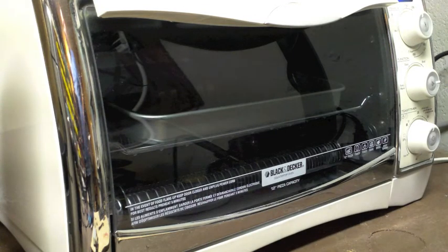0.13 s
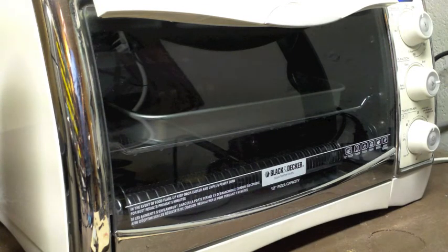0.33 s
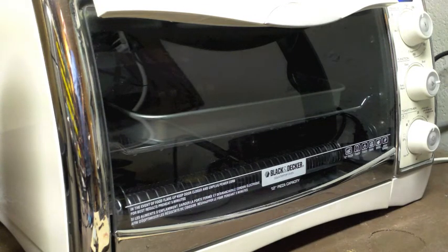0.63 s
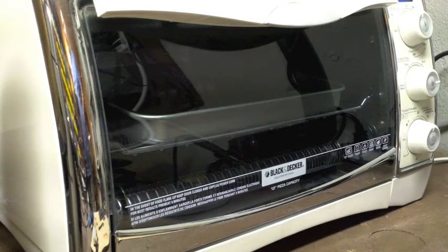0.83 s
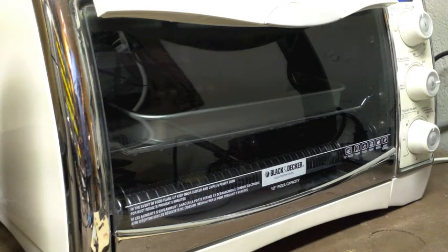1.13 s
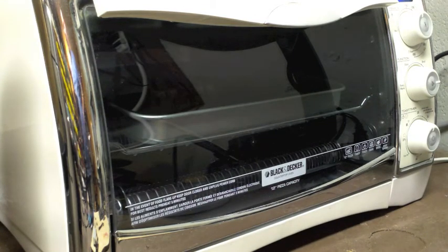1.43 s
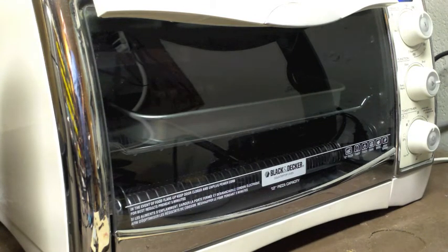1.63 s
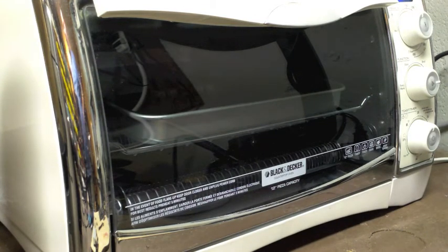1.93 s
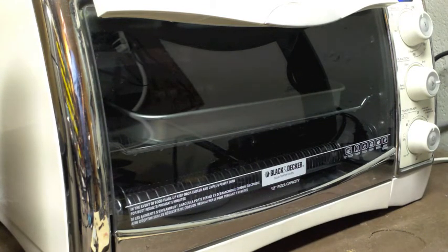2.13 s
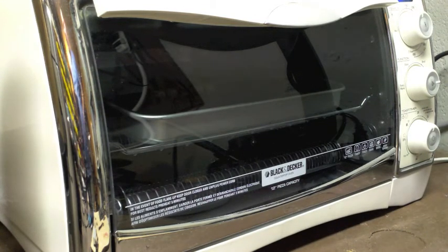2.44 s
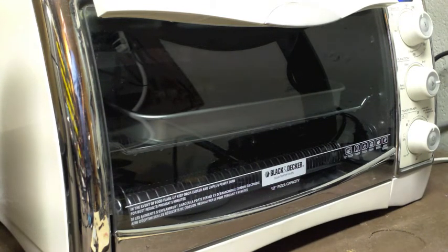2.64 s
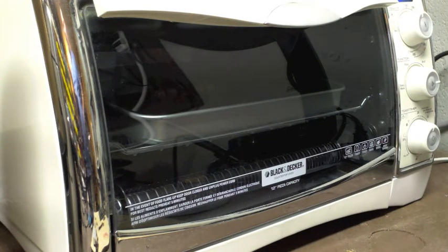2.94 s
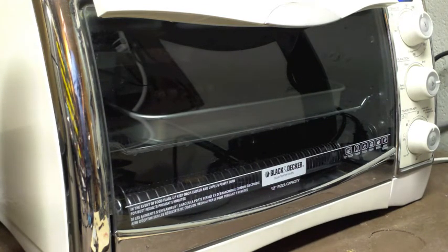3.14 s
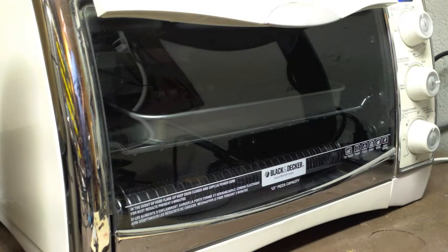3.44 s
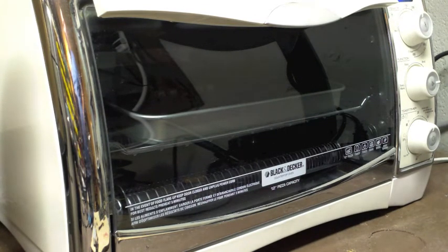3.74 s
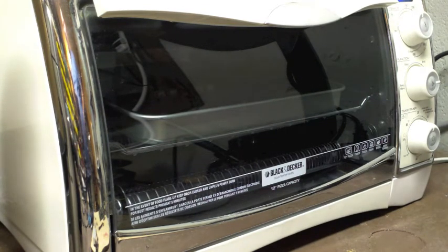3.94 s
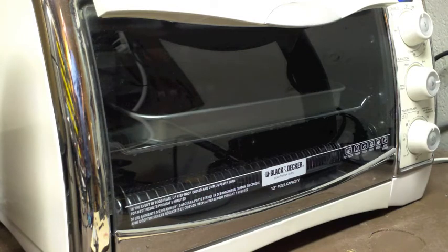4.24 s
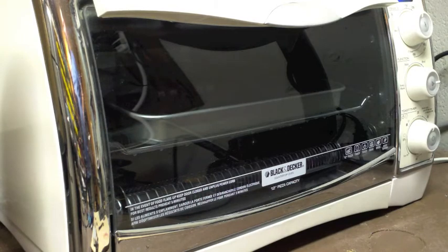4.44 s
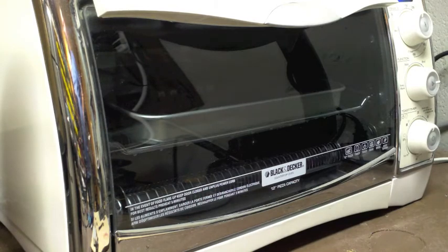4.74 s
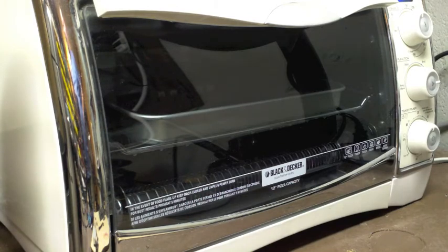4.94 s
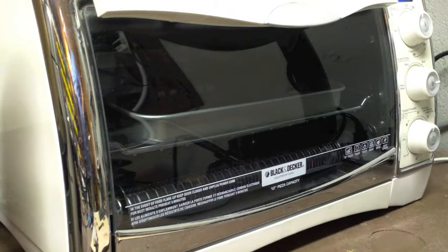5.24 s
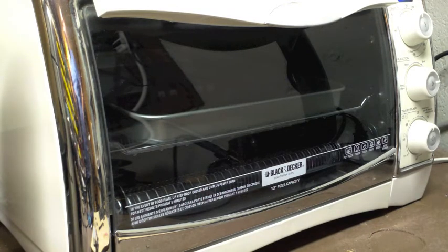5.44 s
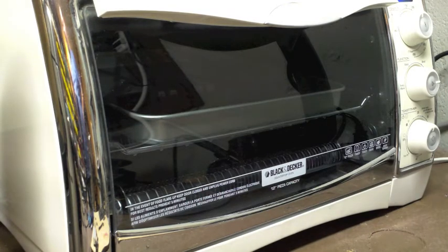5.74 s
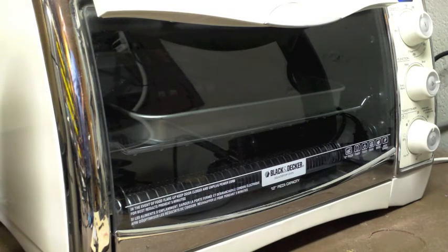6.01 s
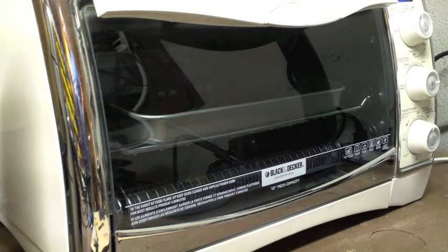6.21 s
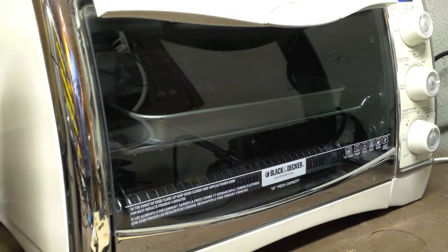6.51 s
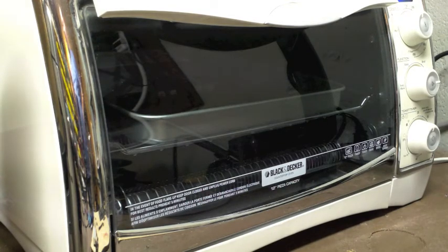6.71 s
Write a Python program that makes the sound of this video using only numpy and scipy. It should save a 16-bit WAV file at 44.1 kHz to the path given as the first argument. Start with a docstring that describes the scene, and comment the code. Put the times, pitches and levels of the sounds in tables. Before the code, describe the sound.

A toaster oven's mechanical timer ticks close to the microphone in a small room, a bright double tick alternating with a lighter tock, about four beats a second. Faint mains hum and airy whirr lie underneath. Midway a few tiny metal pings appear, then a switch scrapes, chinks and snaps loudly once with a brief metallic ring. The ticking carries on unchanged to the end.

```python
"""A toaster oven's clockwork timer ticks close by in a small room.
Its escapement alternates a double tick with a lighter tock: short steel clicks, then filtered noise and
sine tones that stand for the ringing case. The warming metal pings four times, and a switch scrapes,
catches and snaps once: noise bursts and fading tones. Below lie mains hum, built from sines, and room air
with a faint whirr, made of filtered noise."""
import sys
import numpy as np
from scipy import signal
from scipy.fft import rfft, irfft
from scipy.io import wavfile
from scipy.ndimage import uniform_filter1d

SR = 44100
rng = np.random.default_rng(int(sys.argv[2]) if len(sys.argv) > 2 else 0)


def materialize(psi):
    """Save the field psi as 16-bit PCM at rate SR to the path in sys.argv[1].

    A 1-D psi becomes a single channel; in a 2-D psi each row is a channel.
    """
    bounded = np.clip(np.atleast_2d(psi).T, -1, 1)
    quanta = np.round(bounded * 32767).astype(np.int16)
    wavfile.write(sys.argv[1], SR, quanta)


N = 302833
T = np.arange(N) / SR
RING = T[:SR // 3]  # the time axis of one short sound, a third of a second
# the escapement: first tick, one full swing of the balance, and the tock's place in the swing
FIRST_TICK_S, SWING_S, TOCK_AFTER_S = .1784, .46416, .2434
# the blows harden and soften in a slow cycle, as from a slightly off-centre wheel:
# the time of one turn, and a moment when the blows are hardest
WHEEL_TURN_S, HARDEST_S = 7.6, 1.3
TOOTH_SCATTER_DB = .5  # no two teeth strike quite alike
SOFT_LAG_S = .0007  # the softer the blows, the later the beat: lag either side of the mean


def undb(db):
    """Turn decibels into a gain."""
    return 10 ** (np.asarray(db) / 20)


def unit(x):
    """Scale to an rms (average strength) of 1."""
    return x / np.sqrt(np.mean(x ** 2))


def curve(table, axis=1):
    """Join one column of a table by straight lines in time."""
    rows = np.array(table, float)
    return np.interp(T, rows[:, 0], rows[:, axis])


def walk(rate):
    """Slow random wander of rms 1: random steps, 'rate' of them a second, smoothed twice."""
    step_len = int(SR / rate)
    steps = np.repeat(rng.standard_normal(N // step_len + 1), step_len)[:N]
    smoothed = uniform_filter1d(steps, step_len)
    return unit(uniform_filter1d(smoothed, step_len))


def colour(x, spectrum, peaks=()):
    """Filter by a smooth spectrum with narrow resonances on top; rms 1."""
    hz = np.arange(len(x) // 2 + 1) * SR / len(x) + 1e-3  # the tiny offset avoids log(0)
    points = np.array(spectrum, float)
    db = np.interp(np.log(hz), np.log(points[:, 0]), points[:, 1])
    for centre, width, peak_db in peaks:
        db = db + peak_db / (1 + (2 * (hz - centre) / width) ** 2)
    # roll off the bass from half the lowest listed frequency
    low_cut = 1 / np.sqrt(1 + (points[0, 0] / 2 / hz) ** 4)
    return unit(irfft(rfft(x) * undb(db) * low_cut, len(x)))


def hum(hum_db=-1.24, waver_db=0.9):
    """The mains shakes the case at twice its frequency, with a thin wavering buzz of its multiples."""
    # Strength of the hum. Each row: time in seconds, level in dB before hum_db is added.
    hum_levels = [(0, -64.5), (1, -63), (2, -59.5), (3, -57), (4, -55), (4.7, -57.5), (5.4, -56),
                  (6.1, -59.5), (6.87, -59)]
    # Steady buzz. Each row: multiple of the mains frequency, level in dB at the start, level in dB at the end.
    buzz_lines = [(1, -65.5, -80), (3, -74, -75), (4, -73, -70.5), (14, -84, -68.5), (16, -70, -72),
                  (18, -72, -76), (22, -74, -80), (24, -71, -92), (26, -91, -86), (28, -70, -72)]
    mains_hz = 60
    phase = 2 * np.pi * mains_hz * T
    level_db = curve(hum_levels) + hum_db + .5 * walk(2.43)
    out = undb(level_db) * np.sin(2 * phase)
    for multiple, start_db, end_db in buzz_lines:
        db = np.linspace(start_db, end_db, N) + waver_db * walk(3.16)
        phase_wander = walk(5)
        out += undb(db) * np.sin(multiple * phase + phase_wander)
    return np.sqrt(2) * out  # makes the levels rms levels


def background(air_db=-50.0, flicker_db=0.66):
    """Room air with a resonant whirr; a soft hiss dies away early and a low rumble swells late."""
    # Tone of the room air. Each row: frequency in Hz, relative level in dB per Hz.
    air_spectrum = [(25, 1.5), (85, -3.5), (160, -2), (300, -6), (500, -7), (1000, -11), (1800, -10.5),
                    (2700, -14), (5000, -13.5), (6600, -11.5), (8200, -14), (9400, -11.5), (12000, -18.5),
                    (15700, -21)]
    # Narrow resonances in the drone and whirr. Each row: frequency in Hz, width in Hz, boost in dB.
    whirr_peaks = [(84, 10, 7), (280, 40, 3), (1700, 250, 2.5), (3112, 45, 11), (3270, 60, 4),
                   (6370, 40, 4), (6713, 45, 9), (7407, 40, 4), (8538, 15, 11), (8608, 15, 9),
                   (8742, 50, 7), (9020, 90, 6), (9722, 40, 5), (10320, 15, 10), (11650, 15, 7)]
    # Slow changes. Each row: time in seconds, extra hiss level in dB, low rumble level in dB.
    drift = [(0, -50, -80), (.2, -51, -84), (.5, -67, -79), (6.65, -76, -78), (6.87, -80, -48)]
    air = colour(rng.standard_normal(N), air_spectrum, whirr_peaks)
    air = air * undb(air_db + flicker_db * walk(20))
    hiss = colour(rng.standard_normal(N), [(3000, -1), (6500, 4), (10000, 5.0), (15000, -9)])
    rumble = colour(rng.standard_normal(N), [(30, 2), (60, -27), (200, -20), (2000, -70)])
    return air + hiss * undb(curve(drift)) + rumble * undb(curve(drift, axis=2))


def noise(spacing_hz=38):
    """The dense modes of thin metal: evenly spread on average, equally strong, in random phase."""
    count = int(20000 / spacing_hz)
    hz = (np.arange(count) + rng.uniform(.1, .9, count)) * spacing_hz
    bins = (hz * len(RING) / SR).astype(int)
    spectrum = np.zeros(len(RING) // 2 + 1, complex)
    spectrum[bins] = np.exp(2j * np.pi * rng.random(count))
    return unit(irfft(spectrum, len(RING)))


def fade(x, rise_s, t60_s):
    """Build up, then die away by 60 dB in t60_s; the energy is that of 30 ms at rms 1."""
    rise = 1 - np.exp(-(RING / rise_s) ** 2)
    decay = np.exp(-np.log(1000) * RING / t60_s)
    y = x * rise * decay
    return y / np.sqrt(np.sum(y ** 2) / (.03 * SR))


def add(track, s, sound):
    """Mix a sound into the track at a time in seconds."""
    start = int(np.clip(s * SR, 0, N))
    track[start:start + len(sound)] += sound[:N - start]


def hardness(s):
    """Where the wheel stands in its turn: 1 at the hardest blows, -1 at the softest."""
    return np.cos(2 * np.pi * (s - HARDEST_S) / WHEEL_TURN_S)


def swings(offset_s):
    """The times of a blow that comes once in every swing of the balance."""
    even = np.arange(FIRST_TICK_S + offset_s, N / SR, SWING_S)
    return even - SOFT_LAG_S * hardness(even)


def blow(s, mean_db, rise_db):
    """Level of a blow in dB: it follows the turn of the wheel, with a little scatter from tooth to tooth."""
    return mean_db + rise_db * hardness(s) + TOOTH_SCATTER_DB * rng.standard_normal()


def case(dense, modes_db, fresh=0.4, scatter_db=3, detune=0.0029):
    """The case answers each blow with the same modes, in a slightly different mix and tuning."""
    # Modes of the clockwork and its case, before scatter and filtering.
    # Each row: frequency in Hz, relative level in dB.
    case_modes = [(1324, -.5), (1431, -5.5), (1550, -5), (1695, -5), (2034, -3), (2363, -3), (2551, -3),
                  (2650, -4), (3810, -7), (3875, -3), (4247, -4), (4333, -6), (4478, -4), (4688, -3),
                  (4780, -2), (4877, -5), (5033, -4), (5727, -1), (6395, -2), (7380, -3), (7472, -4),
                  (7606, -4), (7886, -2), (8537, -4), (9200, -3), (9431, -2), (9727, -3), (11191, -3)]
    hz, db = np.array(case_modes, float).T
    hz = hz * (1 + detune * rng.standard_normal(len(hz)))
    size = undb(db + scatter_db * rng.standard_normal(len(hz)))
    phase = rng.uniform(0, 2 * np.pi, (len(hz), 1))
    tones = size @ np.sin(2 * np.pi * hz[:, None] * RING + phase)
    # part of the noise is shared by the blows, part is new for each
    return unit(dense + fresh * noise()) + undb(modes_db) * unit(tones)


def click(t60_s, bounce_s, bounce, pallet_hz=9250, crack_db=-1):
    """The small steel pallet pings and rebounds three times; the first contact has 2.5 ms of rms 1 energy."""
    # Colour of the contact noise. Each row: frequency in Hz, relative level in dB.
    click_spectrum = [(2000, -37), (5000, -9), (6400, -1), (8200, -2.5), (9200, 7), (10400, -21),
                      (12000, -7), (15500, -23)]
    out = np.zeros(len(RING))
    for k in range(4):
        ping = np.sin(2 * np.pi * pallet_hz * RING + rng.uniform(0, 2 * np.pi))
        crack = undb(crack_db) * colour(noise(), click_spectrum)
        contact = fade(ping + crack, rise_s=0.00039, t60_s=t60_s)
        out += bounce ** k * np.roll(contact, int(k * bounce_s * SR))
    return out * np.sqrt(2.5 / 30)  # from fade's 30 ms of energy to 2.5 ms


def ticks(drop_s=.0105, rattle_db=-6.5):
    """The pallet unlocks with a thin click; a moment later the wheel's tooth falls and rings the case."""
    # Colour of the case at the unlocking. Each row: frequency in Hz, relative level in dB.
    unlock_spectrum = [(1000, -14), (3000, -22), (3850, -2), (5000, -21), (6400, -5.5), (8200, -22.5),
                       (9200, -1.5), (10400, -23), (11500, -4), (12500, -21.8), (15500, -27.5)]
    # Colour of the case at the tooth's fall. Each row: frequency in Hz, relative level in dB.
    tick_spectrum = [(250, -24), (650, -4.5), (1300, -8), (1900, -4), (2450, 0), (3150, -4), (3900, 4.5),
                     (4700, 2.5), (5400, 1), (7700, -2.5), (8250, -3), (9100, 0), (12500, -16.5),
                     (15500, -22)]
    out = np.zeros(N)
    dense = noise()
    for s in swings(0):
        unlock_db = blow(s, mean_db=-37.5, rise_db=0.5)
        add(out, s, undb(unlock_db) * click(t60_s=.008, bounce_s=.0027, bounce=.45))
        rattle = fade(colour(case(dense, modes_db=1.5), unlock_spectrum), rise_s=0.0031, t60_s=0.083)
        add(out, s, undb(unlock_db + rattle_db) * rattle)
        drop_db = blow(s, mean_db=-37, rise_db=6.5)
        add(out, s + drop_s, undb(drop_db) * click(t60_s=0.0051, bounce_s=0.003, bounce=0.57))
        ring = fade(colour(case(dense, modes_db=-4), tick_spectrum), rise_s=0.0012, t60_s=0.11)
        ring_db = blow(s, mean_db=-36.5, rise_db=0.45)
        add(out, s + drop_s, undb(ring_db) * ring)
    return out


def tocks(slide_s=.029, slide_db=-10.5, accent_swings=4, accent_db=2.5):
    """On the return swing the other pallet slides faintly, then stops a tooth with a single blow."""
    # Colour of the case for slide and blow. Each row: frequency in Hz, relative level in dB.
    tock_spectrum = [(250, -18), (650, -3.5), (1300, -7.5), (2800, -5.5), (3900, 0.6), (5400, -3),
                     (6400, 5.5), (7200, -8.5), (7800, 5.5), (8250, -14), (9100, 0.5), (10500, -5),
                     (12500, -13), (15500, -19)]
    out = np.zeros(N)
    dense = noise()
    for k, s in enumerate(swings(TOCK_AFTER_S)):
        case_db = blow(s, mean_db=-41.5, rise_db=0.5)
        # the click is also sharpest on every fourth swing
        accent = accent_db * np.cos(2 * np.pi * k / accent_swings)
        click_db = blow(s, mean_db=-38, rise_db=1.5) + accent
        slide = fade(colour(case(dense, modes_db=1.0), tock_spectrum), rise_s=0.0012, t60_s=0.14)
        add(out, s - slide_s, undb(case_db + slide_db) * slide)
        add(out, s, undb(click_db) * click(t60_s=.007, bounce_s=0.0027, bounce=0.76))
        ring = fade(colour(case(dense, modes_db=-5.5), tock_spectrum), rise_s=0.0014, t60_s=0.12)
        add(out, s, undb(case_db) * ring)
    return out


def modes(table):
    """Fading sines from rows of (Hz, dB, t60 s), each starting in a random phase."""
    total = np.zeros(len(RING))
    for hz, db, t60 in table:
        tone = np.sin(2 * np.pi * hz * RING + rng.uniform(0, 2 * np.pi))
        total += undb(db) * tone * np.exp(-np.log(1000) * RING / t60)
    return total


def pings(second_s=.0042, second_db=-6, first_db=-5, crack_db=-8, tail_db=-8):
    """A warming panel slips in two quick steps, at the same spot each time, and rings briefly."""
    # The four pings. Each row: start in seconds, level in dB before each part's own offset.
    ping_events = [(2.415, -40.5), (2.6705, -39.5), (3.599, -40), (4.0862, -43)]
    # Modes of the panel, which fade() shortens further.
    # Each row: frequency in Hz, relative level in dB, time to fall by 60 dB in seconds.
    panel_modes = [(1890, -10, 0.04), (2040, -4, 0.055), (3220, -19, 0.037), (3640, -10, 0.048),
                   (3873, 3.5, 0.038), (4280, -26, 0.015), (4730, -8, .035), (5900, -11, 0.025)]
    # Colour of the noise in crack and tail. Each row: frequency in Hz, relative level in dB.
    ping_spectrum = [(1200, -22), (2000, -11), (2500, -9), (3800, 10.5), (4500, -19), (5800, 2),
                     (7000, -17), (12000, -26)]
    out = np.zeros(N)
    for s, db in ping_events:
        crack = fade(colour(noise(), ping_spectrum), rise_s=0.00032, t60_s=0.026)
        add(out, s, undb(db + crack_db) * crack)
        first = fade(modes(panel_modes), rise_s=0.00065, t60_s=.5)
        add(out, s, undb(db + first_db) * first)
        second = fade(modes(panel_modes), rise_s=0.0013, t60_s=0.077)
        add(out, s + second_s, undb(db + second_db) * second)
        tail = fade(colour(noise(), ping_spectrum), rise_s=0.0058, t60_s=0.096)
        add(out, s, undb(db + tail_db) * tail)
    return out


def switch():
    """A spring contact scrapes, catches with a bright chink, then snaps over and leaves its bracket ringing."""
    # Colours of scrape, catch and snap. Each row: frequency in Hz, relative level in dB.
    scrape_spectrum = [(800, -19), (2500, -9), (3400, 0), (5000, -2.5), (6200, 8), (6900, -3), (7500, 3),
                       (8400, -1), (9500, 4.5), (12000, -9), (15500, -19)]
    catch_spectrum = [(200, -28), (280, -22), (500, -31), (2500, -24), (4000, -17), (6200, -12),
                      (8000, -20.5), (9500, -4), (10700, 7.5), (11400, -11), (12200, -14), (13500, -31.6),
                      (15500, -39.0)]
    snap_spectrum = [(200, -23), (600, -11), (1080, -17), (1500, -15), (2900, -5.5), (4300, -2.5),
                     (5700, 3), (6800, -5), (7500, 2.5), (8300, -4), (9100, 1.5), (11500, -3.5),
                     (13500, -9), (15500, -27)]
    # Modes of the switch and its bracket, which fade() shortens a little.
    # Each row: frequency in Hz, relative level in dB, time to fall by 60 dB in seconds.
    bracket_modes = [(786, -20, .08), (1080, -1, .07), (1219, -12, .06), (2790, -3, .09), (2964, -10, .21),
                     (3278, -8, .13), (3795, -7, .12), (3930, -2, .11), (4538, -5, .11), (4718, 0, .13),
                     (5305, -1, .13), (5507, -6, .15), (5757, -1, .19), (5986, -2, .18), (6290, -2, .15),
                     (6479, -6, .12), (7430, 1, .13), (8037, -3, .1), (8659, -6, .11), (8961, -1, .12),
                     (9082, -1, .14), (9294, 1, .12), (10670, -4, .11), (11343, -2, .09), (11687, -5, .1),
                     (12129, -7, .1), (12376, -8, .11)]
    out = np.zeros(N)
    add(out, 4.2075, undb(-38.0) * fade(colour(noise(), scrape_spectrum), rise_s=0.0041, t60_s=0.19))
    # the catch: two quick contacts and a faint thud of the housing
    add(out, 4.5752, undb(-36) * fade(colour(noise(), catch_spectrum), rise_s=0.001, t60_s=0.026))
    add(out, 4.5795, undb(-35) * fade(colour(noise(), catch_spectrum), rise_s=0.00087, t60_s=0.11))
    add(out, 4.565, undb(-54.5) * fade(np.sin(2 * np.pi * 275 * RING), rise_s=0.0046, t60_s=0.22))
    # the spring starts to slip, slams home, and rattles on in its bracket
    add(out, 4.6345, undb(-42) * fade(colour(noise(), snap_spectrum), rise_s=0.0013, t60_s=0.036))
    add(out, 4.6385, undb(-28) * fade(colour(noise(), snap_spectrum), rise_s=.016, t60_s=0.025))
    add(out, 4.643, undb(-35) * fade(colour(noise(), snap_spectrum), rise_s=0.0071, t60_s=0.35))
    add(out, 4.641, undb(-28.0) * fade(modes(bracket_modes), rise_s=0.0013, t60_s=2.3))
    return out


def room(x, wet_db=-11, t60_s=0.19):
    """Bench and near walls return a short, duller tail: the sound is smeared by fading noise."""
    spectrum = [(200, 1), (1400, 9.5), (3000, -1.5), (6000, -11.0), (14000, -10.0)]
    tail = fade(colour(rng.standard_normal(len(RING)), spectrum), rise_s=0.017, t60_s=t60_s)
    echo = signal.fftconvolve(x, tail / np.linalg.norm(tail))[:N]
    return x + undb(wet_db) * echo


def scene():
    """The clockwork, pings and switch sound in the room, over hum and air; both channels are the same."""
    mono = room(ticks() + tocks() + pings() + switch()) + hum() + background()
    return np.array([mono, mono])


def record(dry):
    """The recorder cuts the top: a steep low-pass filter removes what lies above its limit."""
    top_hz = 15800
    low_pass = signal.ellip(10, .1, 80, top_hz, fs=SR, output="sos")
    return signal.sosfilt(low_pass, dry)


dry = scene()
out = record(dry)
materialize(out)
```